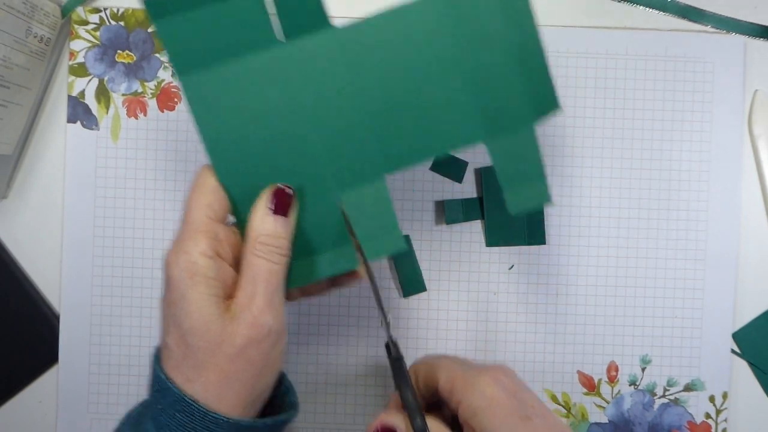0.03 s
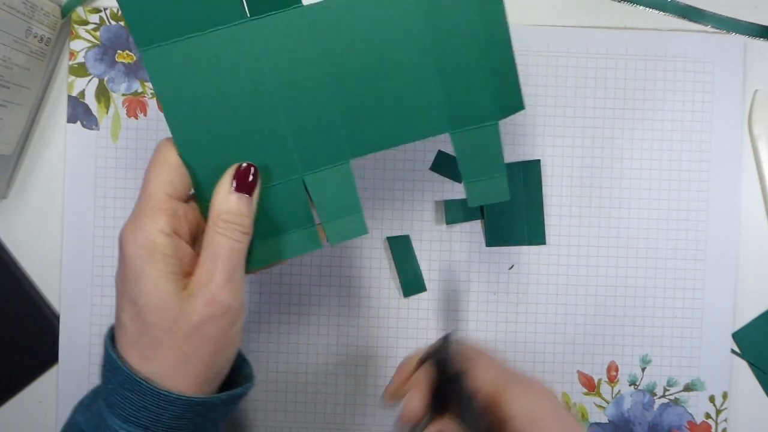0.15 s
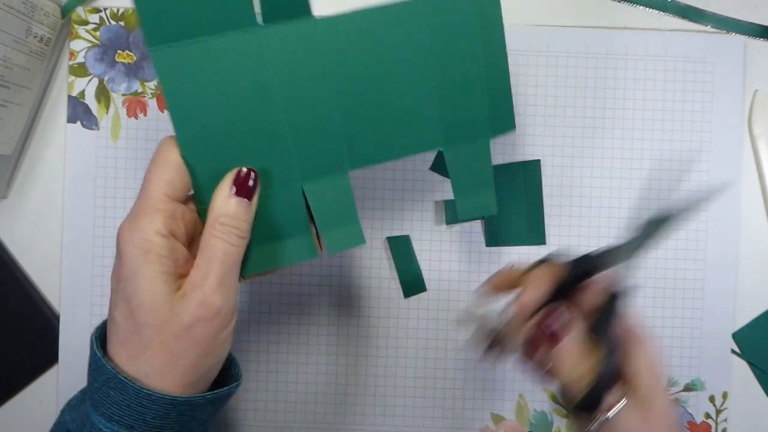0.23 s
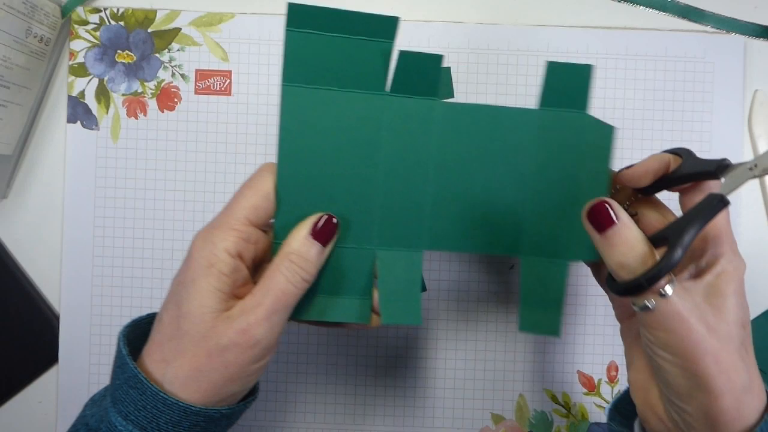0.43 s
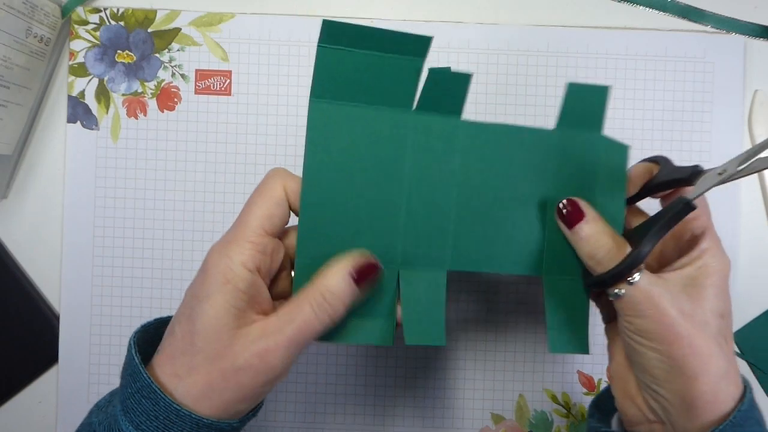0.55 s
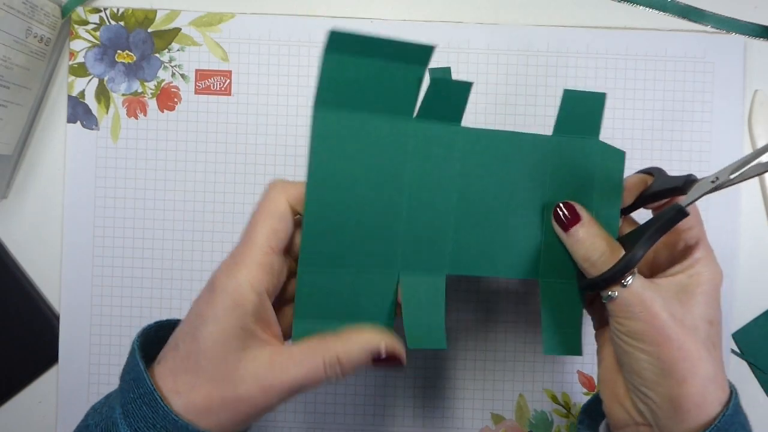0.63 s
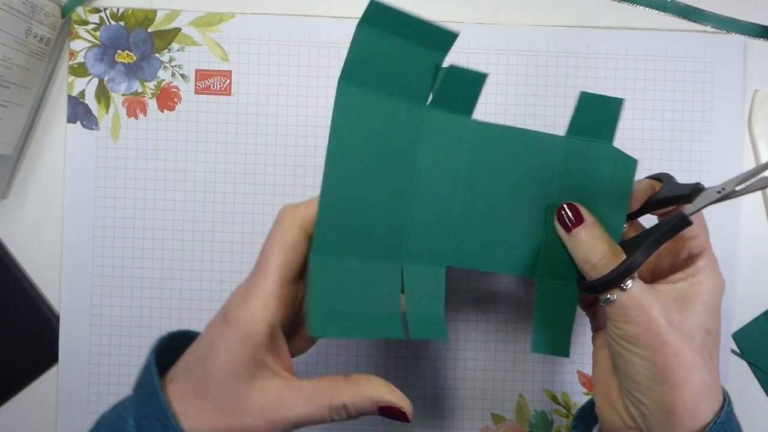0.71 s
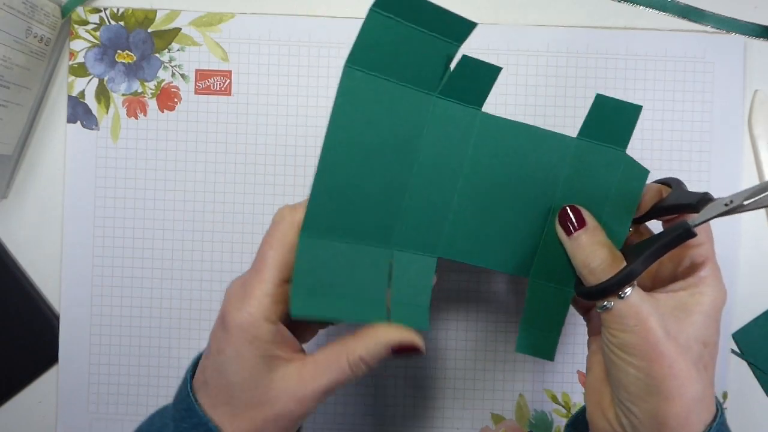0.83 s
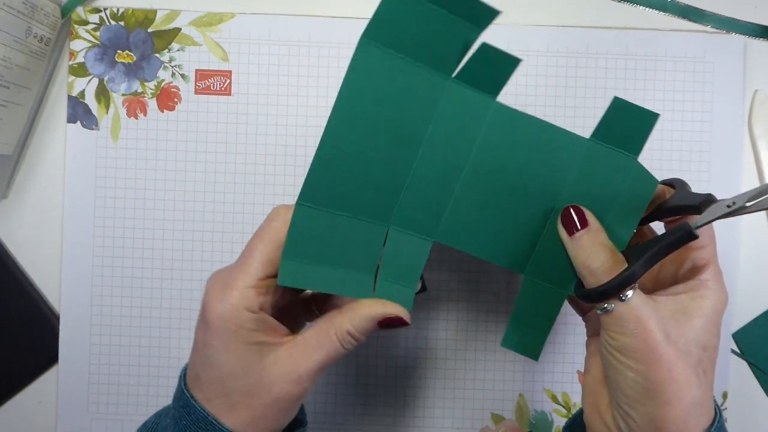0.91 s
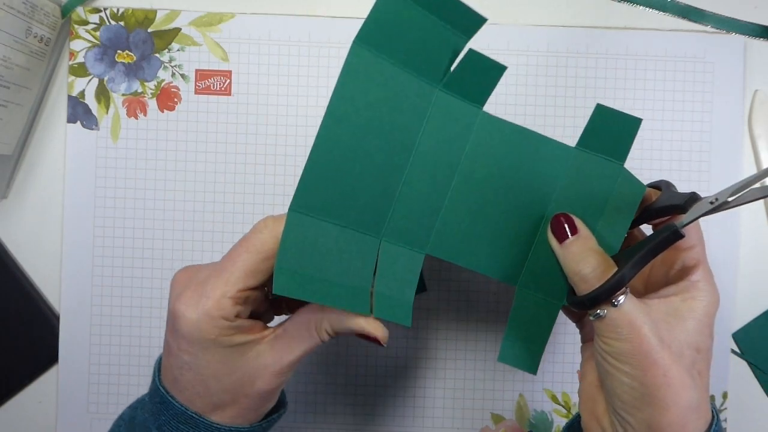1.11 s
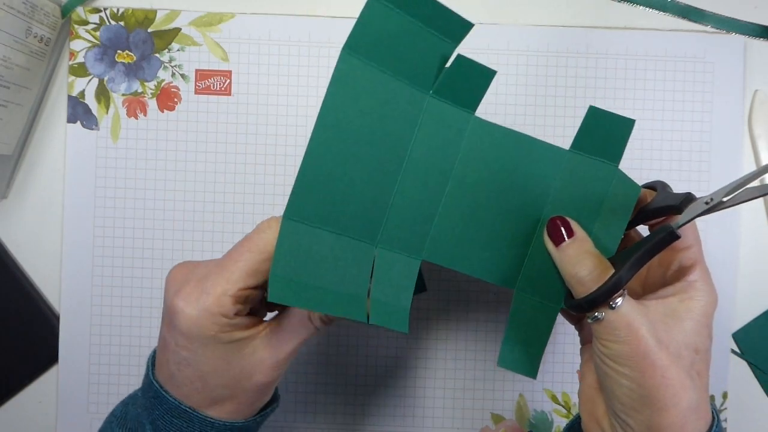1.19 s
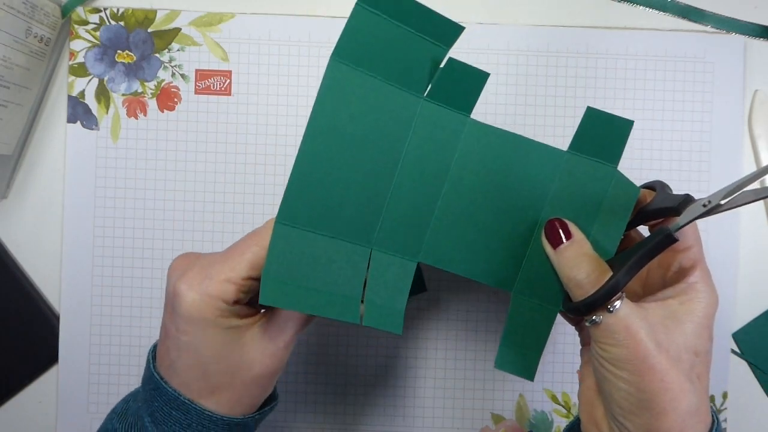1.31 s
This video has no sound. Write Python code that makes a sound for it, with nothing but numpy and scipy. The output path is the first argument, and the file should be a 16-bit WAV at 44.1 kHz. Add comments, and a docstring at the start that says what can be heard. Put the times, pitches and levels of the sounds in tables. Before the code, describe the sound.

Steel scissor blades clicking up close, with knocks and rustles of handled card.

```python
"""Scissors finish a snip in stiff card, close above a craft table. Their steel blades and pivot click
and rattle as the hand swings away: each tiny blow makes the steel ring. Then fingers tap and bend the
card, which knocks and snaps, and rub it with a grainy hiss. A small, quiet room echoes the clicks
and knocks."""
import sys
import numpy as np
from scipy import signal
from scipy.fft import rfft, irfft, next_fast_len
from scipy.io import wavfile
from scipy.ndimage import map_coordinates

SR = 44100
rng = np.random.default_rng(int(sys.argv[2]) if len(sys.argv) > 2 else 0)


def to_wav(sig):
    """Store sig (one row per channel, or 1-D mono) as 16-bit WAV at the path in sys.argv[1].

    Samples outside -1..1 are clipped; the rate is SR.
    """
    pcm = np.clip(np.atleast_2d(sig), -1, 1) * 32767
    pcm = np.round(pcm).astype(np.int16)
    wavfile.write(sys.argv[1], SR, pcm.T)  # frames by channels


N = 59535


def amp(db):
    """Turn decibels into a gain."""
    return 10 ** (np.asarray(db) / 20)

def unit(x):
    """Scale a signal to an average (rms) level of 1."""
    return x / np.sqrt(np.mean(x ** 2) + 1e-20)

def along(points, hz):
    """Read between a table's rows on a log frequency axis."""
    f, values = np.transpose(points)
    return np.interp(np.log(hz + 1), np.log(f + 1), values)

def filtered(x, response):
    """Give each frequency f in x the gain response(f)."""
    n = x.shape[-1]
    padded = next_fast_len(n + 8192)
    return irfft(rfft(x, padded) * response(np.fft.rfftfreq(padded, 1 / SR)), padded)[..., :n]

def resonant(modes, f):
    """How strongly an object answers at f, given its modes: the tones it rings at."""
    return sum((-1) ** k * amp(db) * 1j * f * width / (hz * hz - f * f + 1j * f * width)
               for k, (hz, width, db) in enumerate(modes))

def wobble(per_s, size=N):
    """A smooth curve through per_s random values a second."""
    knots = rng.standard_normal(int(size * per_s / SR) + 4)
    return map_coordinates(knots, [np.arange(size) * per_s / SR])

# How alike left and right sound: f/Hz, likeness (1 = the same)
LIKENESS = [(60, 0.465), (300, 0.77), (1000, 0.22), (4000, 0.65), (15000, 0.59)]
def spread(pair, response):
    """Filter two noises and blend them into stereo at level 1."""
    turn = lambda f: np.arccos(np.clip(along(LIKENESS, f), -1, 1)) / 2
    mid, side = filtered(pair, lambda f: response(f) * [np.cos(turn(f)), np.sin(turn(f))])
    return unit(np.array([mid + side, mid - side]))

# The room's own hush: f/Hz, relative level/dB
HUSH = [(15, -48), (25, -6), (463, 0), (607, -3), (1790, -10), (2690, -13), (5140, -16), (9570, -22),
        (16000, -17)]
def room_hush():
    """Soft, low noise whose level wavers a little."""
    level = amp(-54.5 + wobble(per_s=9.08))
    return level * spread(rng.standard_normal((2, N)), lambda f: amp(along(HUSH, f)))

# How long echoes last: f/Hz, time to fade by 60 dB/s
ECHO_FADE = [(300, 0.27), (2000, 0.085), (9000, 0.12), (14000, 0.17)]
def room_echo(x, step_s=.05, delay_s=.004):
    """Table and walls throw sound back as a short, diffuse echo, drawn afresh for each step."""
    step, out = round(step_s * SR), np.zeros((2, N + SR))
    for start in range(0, N, step):
        noise = spread(rng.standard_normal((2, SR // 4)), np.ones_like)
        hz, t, spectrum = signal.stft(noise, SR, nperseg=256)
        fade = amp(-60 * t / along(ECHO_FADE, hz)[:, None])
        tail = signal.istft(spectrum * fade, SR, nperseg=256)[1]
        tail /= np.linalg.norm(tail, axis=1, keepdims=True)
        echo = signal.fftconvolve(x[:, start:start + step], tail, axes=1)
        out[:, start + round(delay_s * SR):][:, :echo.shape[1]] += echo
    return out[:, :N]

# The bright hiss and the lower body of the rubbing: f/Hz, relative level/dB
HISS = [(1470, -15), (2830, -12.5), (3980, -14), (4480, -9), (7710, -11), (11100, -5), (13200, -19.5),
        (14700, -23), (16000, -92.5)]
BODY = [(120, -8), (200, -4), (389, -5.5), (1240, 0), (1950, -5.5), (2710, -3.5), (4000, -5.5), (5850, -15),
        (9900, -120)]
# Tones of the card sheet, and of its fold cupped in the hand: f/Hz, width/Hz, relative level/dB
CARD_MODES = [(145, 37, -11), (209, 190, -16.5), (422, 56, 8), (612.6, 28.6, -2.5), (924, 188, 6.5),
              (1288, 104, 4), (2188, 100, 2), (2675, 44, 1.5), (2964, 430, 6.5), (3564, 146, 3.5),
              (4200, 290, 0), (4860, 86, 2.5), (5836, 1020, 15)]
HOLLOW_MODES = [(558, 71, 7.5), (2816, 124, -1.5)]
# Strokes along the card: start/s, end/s, rise/s, time to fade by 60 dB/s, hiss/dB, body/dB, hollow/dB
STROKES = [(0.057, 0.105, 0.015, 0.22, -45.5, -47, -62), (0.186, 0.213, 0.025, 0.17, -48.5, -51, -88),
           (0.288, 0.508, 0.13, 1, -48.5, -56.5, -76), (0.593, 0.673, 0.0085, 0.38, -41, -43.5, -54.5),
           (0.714, 0.758, 0.022, 0.026, -45, -38.5, -62), (0.862, 0.93, 0.0084, 0.042, -88, -84, -51),
           (0.93, 0.994, 0.0092, 0.383, -44.5, -47, -51.5),
           (1.03, 1.076, 0.055, 0.037, -38.5, -40.5, -45.5), (1.08, 1.347, 0.0204, 0.37, -69, -65.5, -57.5),
           (1.173, 1.311, 0.12, 0.071, -58.5, -60, -83)]
def card_rubbing(grains_per_s=4000, grain_share=.35, uneven_db=1.2):
    """Fingers and blades drag on the card: grainy friction hisses and makes the sheet ring."""
    t = np.arange(N) / SR
    grains = (rng.random((2, N)) < grains_per_s / SR) * amp(1.5 * rng.exponential(size=(2, N)))

    def drag():
        gritty = np.sqrt(grain_share) * unit(grains * rng.standard_normal((2, N)))
        return gritty + np.sqrt(1 - grain_share) * rng.standard_normal((2, N))

    def stroke(start, end, rise, fade):
        return np.clip((t - start) / rise, 0, 1) ** 2 * amp(-60 * np.clip(t - end, 0, None) / fade)

    def level(column):
        strokes = sum(amp(row[column]) * stroke(*row[:4]) for row in STROKES)
        return strokes * amp(uneven_db * wobble(per_s=61))

    hiss = spread(drag(), lambda f: amp(along(HISS, f)))
    body = spread(drag(), lambda f: amp(along(BODY, f)) * (amp(.5) + np.abs(resonant(CARD_MODES, f))))
    hollow = spread(drag(), lambda f: resonant(HOLLOW_MODES, f))
    return level(4) * hiss + level(5) * body + level(6) * hollow

def struck(blows, modes, crack_db, flutter_db=6, scatter_db=1.5, waver=.3):
    """Each blow is a short, uneven push. It cracks, and rings the modes near its pitch most."""
    out, t = np.zeros((2, N + SR)), np.arange(SR // 10) / SR
    mode_hz, width, mode_db = np.transpose(modes)[:, :, None]
    for start, db, hz, pan_db, contact_s, octaves in blows:
        age = t / max(contact_s, 1e-4)
        push = (age * np.exp(-age)) ** 2 * amp(flutter_db * np.tanh(wobble(804, len(t))))
        nearness = np.exp(-(np.log2(mode_hz / hz) / octaves) ** 2)
        gains = amp(mode_db + scatter_db * rng.standard_normal(mode_hz.shape)) * nearness
        decay = np.exp(-np.pi * width * t)  # wider modes die sooner
        swell = signal.fftconvolve(push[None], decay, axes=1)[:, :len(t)]
        drift = np.cumsum([wobble(332, len(t)) for _ in modes], axis=1) * waver * width / SR
        tones = np.sin(2 * np.pi * (mode_hz * t + drift + rng.random(mode_hz.shape) / 2))
        ring = (gains * tones * swell / swell.max(axis=1, keepdims=True)).sum(axis=0)
        band = [(hz, hz * np.clip(octaves, .1, 3), 0)]
        crack = filtered(push * rng.standard_normal(len(t)), lambda f: resonant(band, f) ** 2)
        crack_gain = amp(crack_db + 5 * np.log2(octaves))  # broader blows crack more, ring less
        blow = ring / np.abs(ring).max() + crack_gain * crack / np.abs(crack).max()
        left_right = amp(db + np.array([[.5], [-.5]]) * pan_db)
        out[:, round(start * SR):][:, :len(t)] += left_right * blow / np.abs(blow).max()
    return out[:, :N]

# Blows to the card: t/s, peak level/dB, f/Hz, left minus right/dB, contact time/s, breadth/octaves
KNOCKS = [(.168, -31.5, 1470, 4, 0.00047, 2.5), (.173, -42, 380, 3, 0.00078, 0.59),
          (.4535, -38.5, 1400, 2.5, 0.0015, 0.62), (.562, -18, 900, -1.5, 0.00028, 1.7),
          (.5622, -25.5, 3940, -2, 0.00084, 0.29), (.563, -42, 159, 1.5, 0.0022, 0.8),
          (.5688, -31.5, 3780, 12.5, 0.00072, 0.46), (.573, -32, 960, 3.5, 0.0041, 0.38),
          (.6185, -19, 2820, 2, 0.0001, 0.8), (.6203, -15, 2850, -1, 0.00018, 2),
          (.662, -29, 647, 3, 0.002, 0.52), (.810, -31.5, 1020, 1, 0.0032, 1.9),
          (.9245, -31.5, 2220, 2, 0.00037, 0.51), (.9428, -22.5, 1060, 0, 0.00029, 1.33),
          (.944, -46, 162, 0.5, 0.003, 0.69), (.9495, -32, 1100, -2, 0.00029, 0.56),
          (1.0, -35, 595, 0, 0.0053, 4.6), (1.068, -38.5, 1090, 0, 0.0061, 0.21),
          (1.107, -42.5, 3100, 2.5, 0.0021, 0.23)]
def card_knocks():
    """Tapped and bent, the stiff sheet knocks and snaps at its own tones."""
    return struck(KNOCKS, CARD_MODES, crack_db=-11)

# Tones of the steel scissors: f/Hz, width/Hz, relative level/dB
STEEL_MODES = [(5850, 500, -12), (6300, 450, -11), (7300, 600, -12), (8900, 260, -2), (9500, 500, -6),
               (10350, 400, -4), (11070, 400, -3), (11600, 450, -5), (12350, 330, -1), (13050, 400, -7)]
# Steel hitting steel: t/s, peak level/dB, f/Hz, left minus right/dB, contact time/s, breadth/octaves
CLICKS = [(.1160, -32, 10300, 3, 0.0013, 0.18), (.168, -19, 8300, 5, 0.0013, 1.9),
          (.2178, -14, 9400, 4.5, 0.000097, 1.8), (.2195, -18.5, 9300, -2, 0.00091, 1.1),
          (.2235, -27, 9600, 6, 0.00042, 0.23), (.3157, -38.5, 8100, 3.5, 0.00057, 0.75),
          (.3526, -36.5, 11900, 5, 0.0018, 0.5), (.3585, -34, 10500, -3, 0.00066, 0.48),
          (.378, -26.5, 6100, 1, 0.0015, 0.73), (.4098, -23, 9500, -3, 0.00092, 1.1),
          (.4208, -21, 12550, 16, 0.0013, 0.091), (.4256, -10.5, 12600, 0.5, 0.0017, 0.5),
          (.4261, -20.5, 5200, 0, 0.0014, 0.82), (.4263, -13, 9030, 2.5, 0.0017, 0.23),
          (.4325, -23, 10800, 9, 0.0025, 0.62), (.4428, -19, 10400, -5, 0.0019, 1.5),
          (.4532, -21.5, 8800, -3, 0.0015, 0.21), (.5092, -19.5, 10400, -1, 0.0011, 0.77),
          (.5162, -21, 11000, -9, 0.00026, 0.12), (.5225, -19, 11900, 7, 0.0033, 0.36),
          (.5915, -18.5, 10400, 3, 0.0029, 0.89), (.6016, -17, 12200, 5, 0.0013, 0.11),
          (.608, -23, 11200, -1, 0.00032, 0.72), (.9228, -30, 10250, -2.5, 0.00066, 0.089),
          (1.0725, -31, 5500, 2, 0.003, 0.085)]
def scissor_clicks():
    """Blades and pivot knock together and give short, high rings."""
    return struck(CLICKS, STEEL_MODES, crack_db=0)

def scene():
    """Clicks and knocks with their echo, over rubbing and the room's hush."""
    hits = scissor_clicks() + card_knocks()
    return hits + amp(-9) * room_echo(hits) + card_rubbing() + room_hush()

# Overall tone: f/Hz, gain/dB
TONE = [(25, -23), (110, -8.5), (200, -1), (13000, 0.5), (14500, -21), (15500, -18), (16300, -43)]
def record(dry, top_hz=16338):
    """Soften the deep bass and highest treble, and cut everything above top_hz."""
    return filtered(dry, lambda f: amp(along(TONE, f)) * (f < top_hz))


dry = scene()
out = record(dry)
to_wav(out)
```